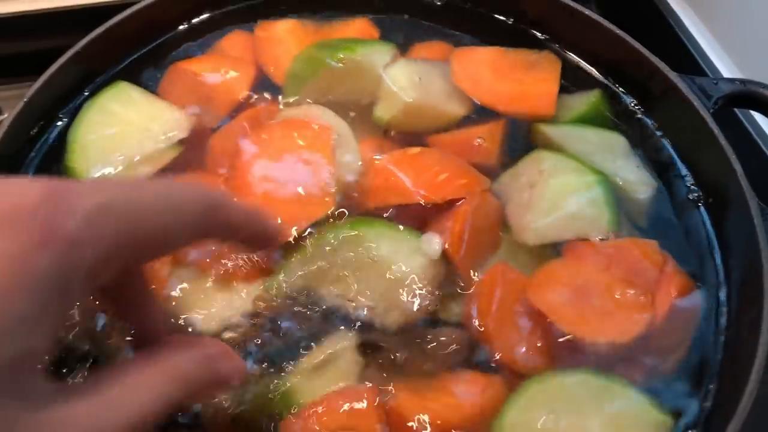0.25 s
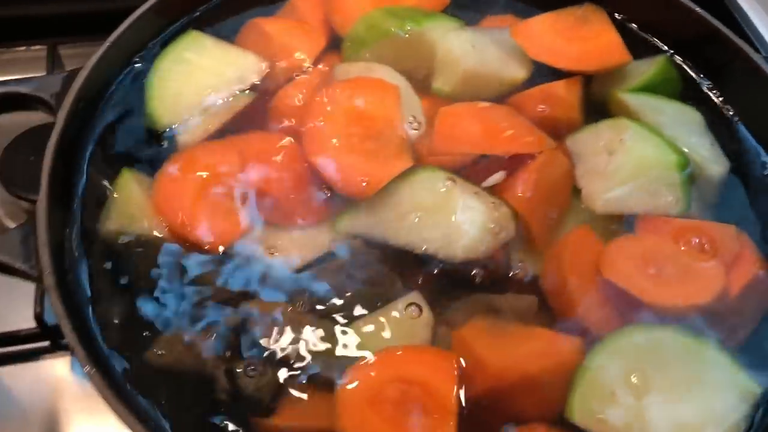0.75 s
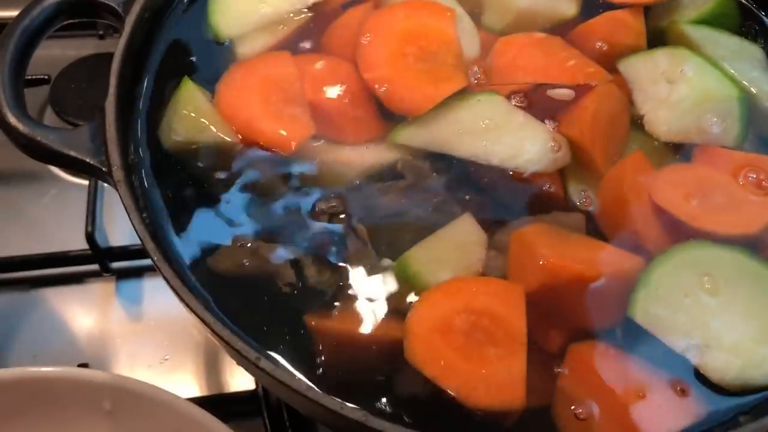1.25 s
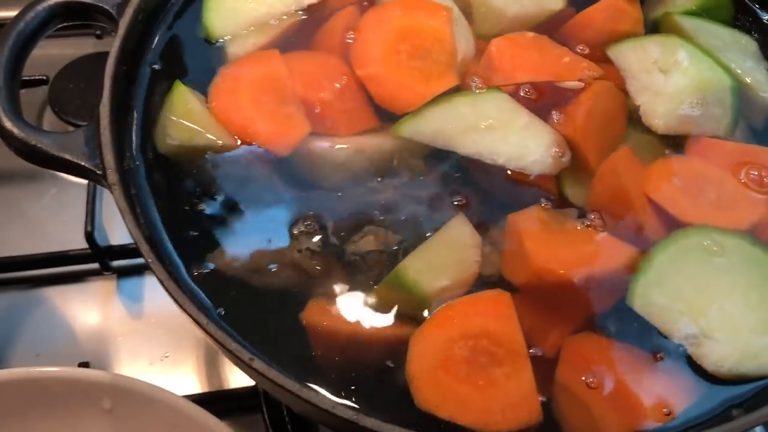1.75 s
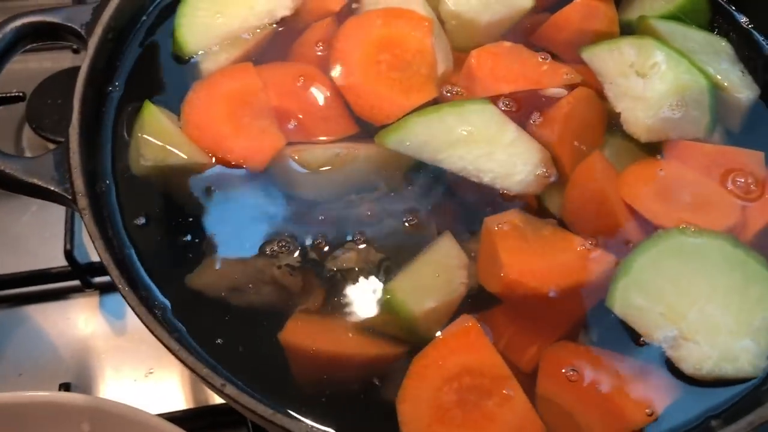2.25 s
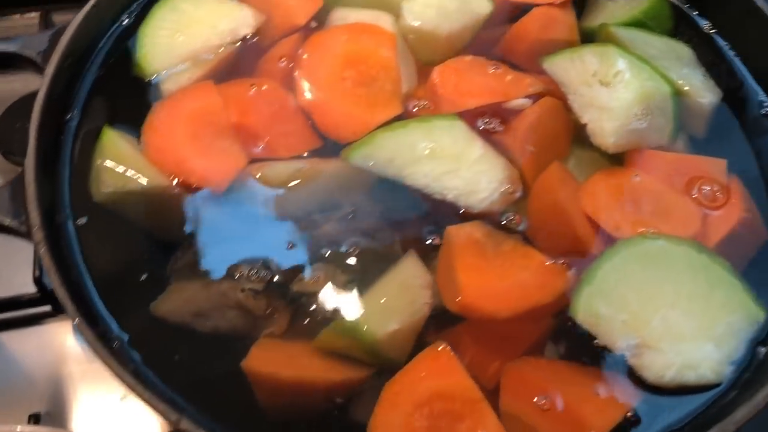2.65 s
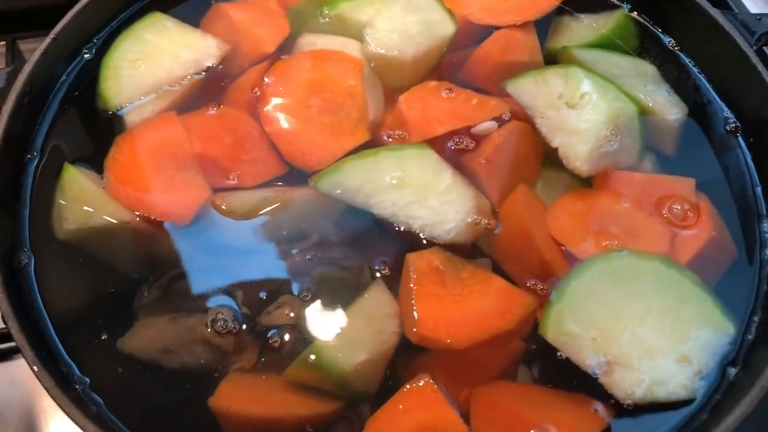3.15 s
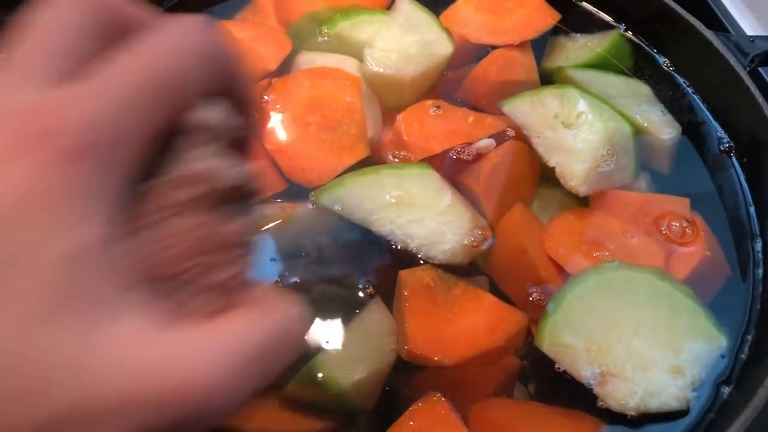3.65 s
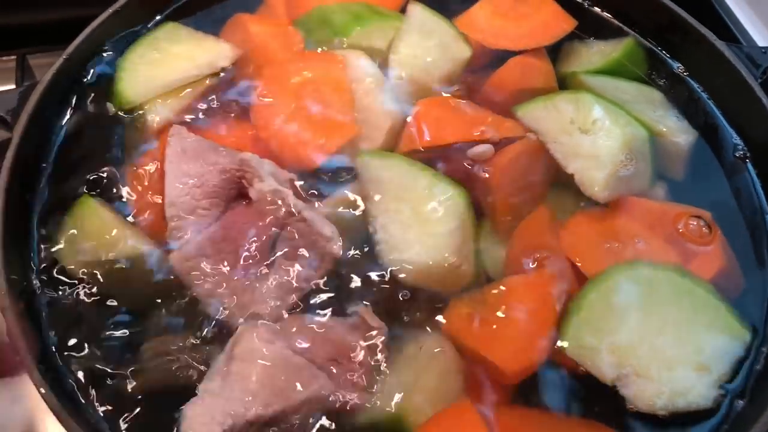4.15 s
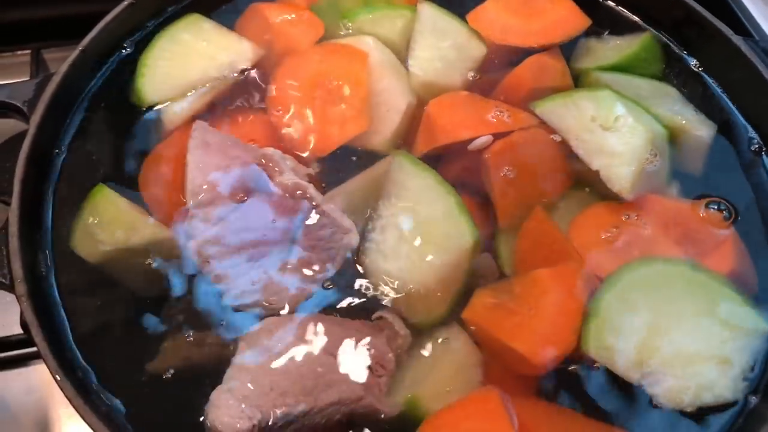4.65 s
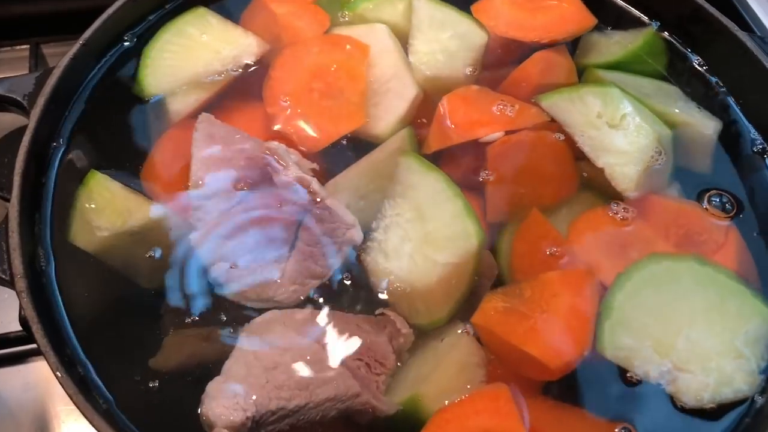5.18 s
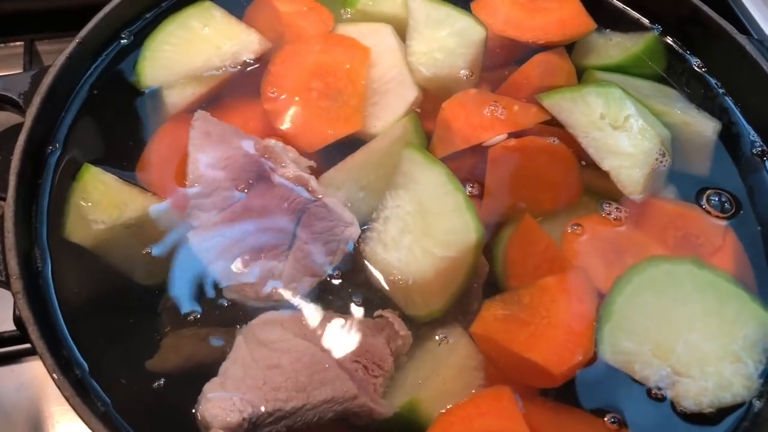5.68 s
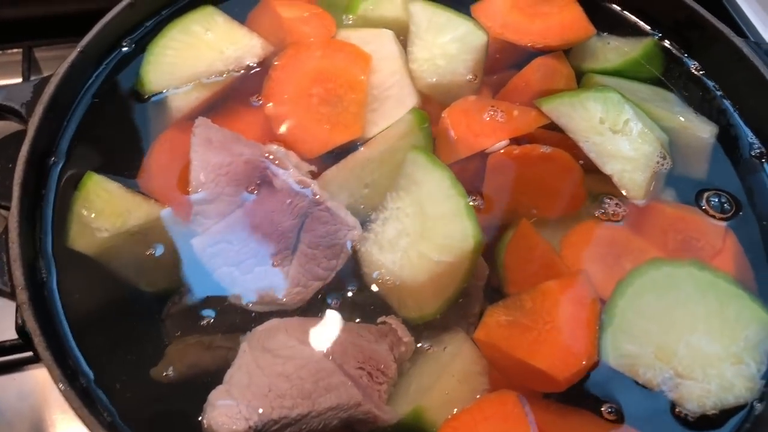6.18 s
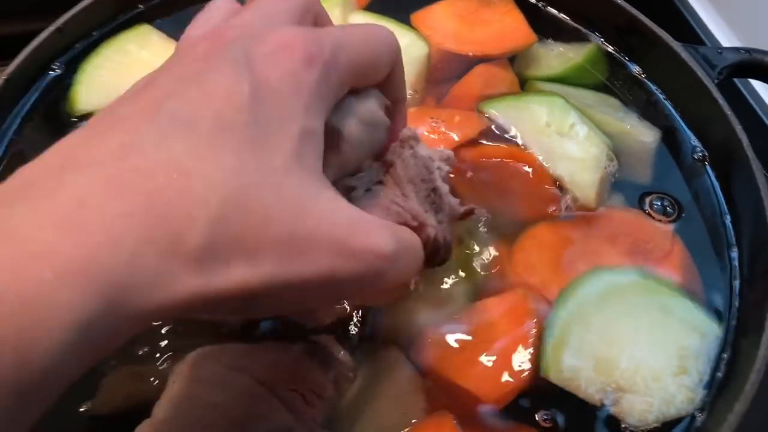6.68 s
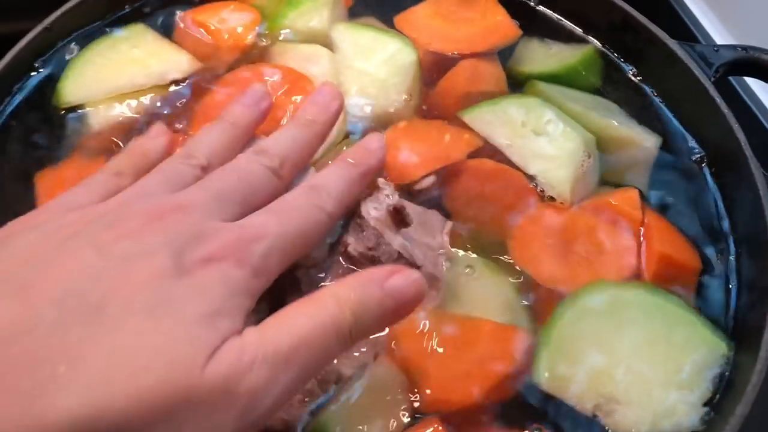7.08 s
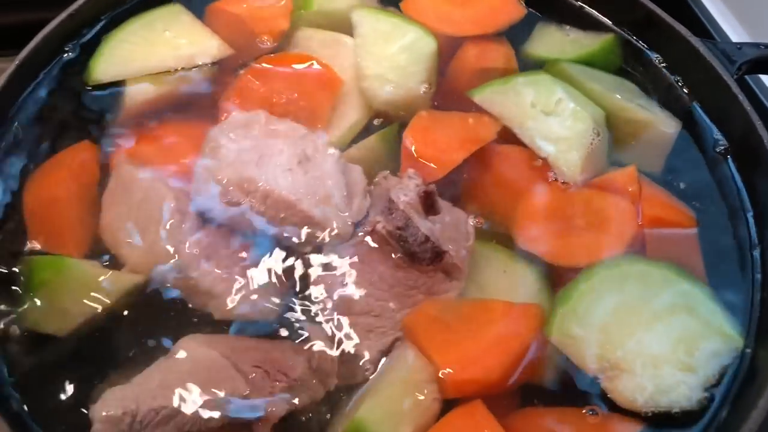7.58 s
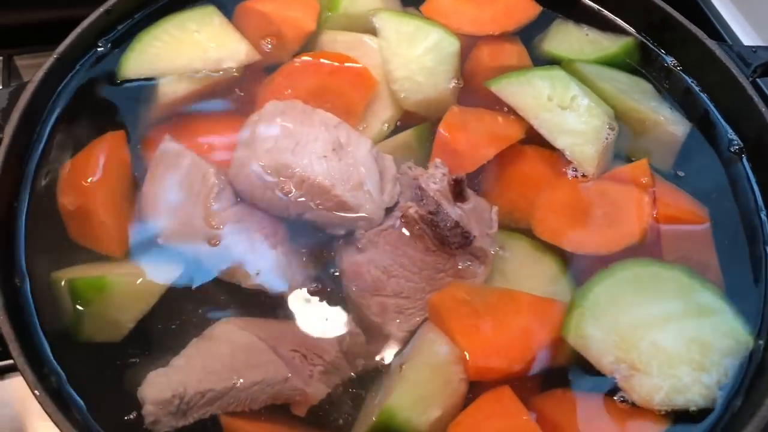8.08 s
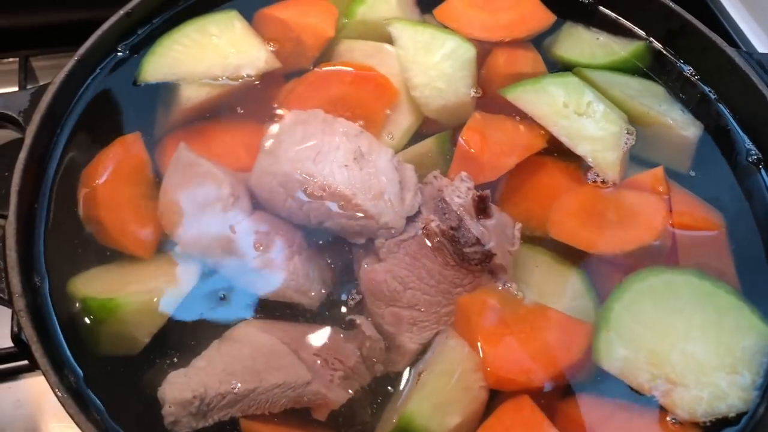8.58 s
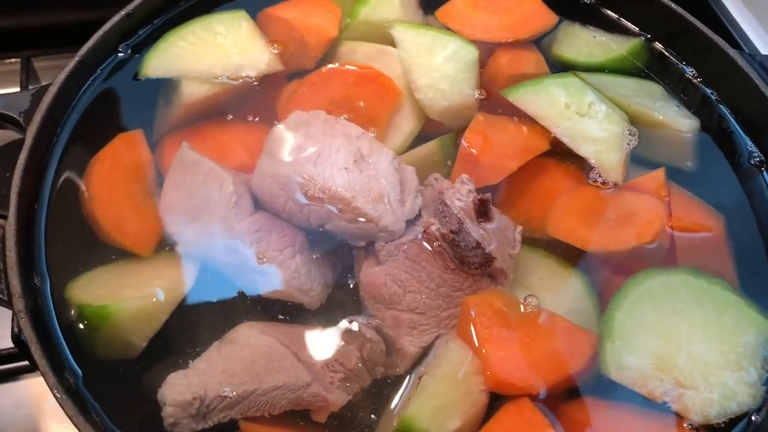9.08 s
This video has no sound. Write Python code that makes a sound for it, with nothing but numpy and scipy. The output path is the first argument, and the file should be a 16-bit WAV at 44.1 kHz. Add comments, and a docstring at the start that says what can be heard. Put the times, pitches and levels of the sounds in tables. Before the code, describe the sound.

A gas flame rumbles quietly and a fridge hums in a small, hard-walled kitchen, while soup heating close to the microphone gives off crisp little bubble snaps. Meat goes into the water twice, first with a slight splash, later with a fuller, plopping one. Around these, the iron pot ticks, clinks on its grate, and the sheet-metal hob knocks with a dull thud. Light ticking and fizzing carry on afterwards.

```python
"""A small kitchen, just above a cast-iron pot of soup heating on a gas hob.
A fridge hums and the burner rumbles; tiny bubbles fizz and snap as they burst. Twice a piece
of meat splashes in, and trapped air rings in the water. Thermal expansion makes the pot wall
tick, the pot slip on its iron grate and the sheet-metal hob buckle with a knock. Each metal
part rings in its own modes over a thud of the hollow stove, and hard walls add a short echo."""
import sys
import numpy as np
from scipy import signal
from scipy.fft import rfft, irfft
from scipy.io import wavfile

SR = 44100
rng = np.random.default_rng(int(sys.argv[2]) if len(sys.argv) > 2 else 0)


def digitize_waveform(pressure):
    """Quantize a signal to 16-bit integers and store it at the path in sys.argv[1].

    Rows of a 2-D input are taken as channels; values are limited to [-1, 1].
    """
    field = np.atleast_2d(pressure).T
    bounded = np.clip(field, -1, 1)
    quanta = np.round(bounded * 32767).astype(np.int16)
    wavfile.write(sys.argv[1], SR, quanta)


N = 411453
T = np.arange(SR // 2) / SR  # time axis of one event
EDGE_HZ = 16050  # upper band limit


def amp(db):
    """Amplitude ratio of a level: a factor of ten per 20 dB."""
    return 10 ** (np.asarray(db) / 20)


def evened(x):
    """Normalisation to an rms of 1."""
    return x / np.sqrt(np.mean(x ** 2) + 1e-20)


def read(points, hz):
    """Interpolation of (f/Hz, value) points on a logarithmic frequency axis."""
    f, value = np.transpose(points)
    return np.interp(np.log(hz + 1), np.log(f), value)


def add(mix, s, sound):
    """Superposition: a sound joins the mix at s seconds."""
    part = mix[max(round(s * SR), 0):][:len(sound)]
    part += sound[:len(part)]


def noise(spectrum, size):
    """Spectral shaping: noise of rms 1 whose spectrum follows (f/Hz, level/dB) points."""
    hz = np.fft.rfftfreq(size, 1 / SR)
    white = rfft(rng.standard_normal(size))
    return evened(irfft(white * amp(read(spectrum, hz)), size))


def dying(t60):
    """Exponential damping by 60 dB in t60 seconds."""
    return np.exp(-np.log(1000) * T / max(t60, 1e-4))


def colour(x, gain_db):
    """Minimum-phase filtering by a gain in dB given as a function of frequency."""
    hz = abs(np.fft.fftfreq(len(x), 1 / SR)) + 1
    log_gain = np.log(amp(gain_db(hz)))
    response = np.exp(signal.hilbert(log_gain).conj())
    return np.fft.ifft(np.fft.fft(x) * response).real


def kitchen(x, onset_s=0.0044):
    """Reverberation: dense reflections from hard walls, each band absorbed at its own rate."""
    # reverberation time: f/Hz, t60/s
    decay_times = [(150, 0.49), (1000, 0.34), (2500, 0.4), (4500, 0.37), (8000, 0.21), (16000, 0.18)]
    hz, t, bands = signal.stft(rng.standard_normal(len(T)), SR, nperseg=256)
    decay = amp(-60 * t / read(decay_times, hz)[:, None])
    tail = signal.istft(bands * decay, SR, nperseg=256)[1][:len(T)]
    tail *= np.minimum(T / onset_s, 1) ** 2
    return signal.oaconvolve(x, tail / np.linalg.norm(tail))[:N]


def fridge(hum_db=-62.0, whine_db=-77.0, mains_hz=50, shaft_hz=49.275, first_stroke_s=0.0125):
    """Forced vibration: a compressor hums at mains frequency and its piston drives a thin high ring."""
    # spectral envelope of the ring: f/Hz, level/dB
    spectrum = [(2800, -39), (2955, -5), (3005, 0.5), (3054, 7), (3103, 0), (3152, 4.5), (3201, -15),
                (3300, -6), (3349, -2), (3450, -28), (3600, -15)]
    # its slow wavering about whine_db: t/s, level/dB
    wavering = [(0, 1.5), (0.9, 1), (1.7, 2), (2.85, -3.5), (3.5, 0.5), (4.6, 0.5), (5.4, -3.5), (6.3, 1),
                (7.1, -1), (7.8, -0.5), (9.33, 0.5)]
    t = np.arange(N) / SR
    hum = np.sin(2 * np.pi * mains_hz * t)
    # the shaft's harmonics are partly in phase, so the whine trills once a turn
    harmonics_hz = shaft_hz * np.arange(57, 74)
    phases = 0.7 * rng.standard_normal(len(harmonics_hz))
    whine = sum(amp(read(spectrum, hz)) * np.cos(2 * np.pi * hz * (t - first_stroke_s) + phase)
                for hz, phase in zip(harmonics_hz, phases))
    waver_db = np.interp(t, *np.transpose(wavering))
    return amp(hum_db) * evened(hum) + amp(whine_db + waver_db) * evened(whine)


def burner(rumble_db=-57.0, rush_db=-71.5, flutter_db=0.5):
    """Combustion and flow noise: the flame rumbles and flutters under the soft rush of gas."""
    # spectrum of the flame: f/Hz, level/dB
    rumble = [(20, -43), (34, -11), (42, -21.5), (58, -2.5), (75, -9.5), (90, 3.5), (105, -8.5),
              (122, -0.5), (160, -8.5), (190, -3.5), (230, -12), (300, -12), (400, -20.5), (520, -19),
              (700, -28), (1500, -45), (16000, -88)]
    # spectrum of the gas flow: f/Hz, level/dB
    rush = [(20, -42), (500, -23), (700, -1), (790, 5.5), (1000, -1.5), (1500, -4), (2500, -6), (4000, -10),
            (8000, -15.5), (16000, -20.5)]
    flutter = noise([(1, 0), (8, 0), (30, -40), (100, -100)], N)
    return amp(rumble_db + flutter_db * flutter) * noise(rumble, N) + amp(rush_db) * noise(rush, N)


def snap(hz, t60=0.0046, scatter_db=-23, scatter_t60=0.14, samples=3600):
    """Film rupture: a sharp tick of unit energy around hz, trailed by its scatter inside the pot."""
    band = [(hz / 20, -60), (hz / 4, -36), (hz / 2, -15), (hz, 0), (hz * 2, -14)]
    envelope = dying(t60) + amp(scatter_db) * dying(scatter_t60)
    burst = colour(rng.standard_normal(samples) * envelope[:samples], lambda f: read(band, f))
    return burst / np.linalg.norm(burst)


def simmer(snap_db=8.5, calm_db=-86.5, clump_db=4, faint_db=-57, faint_range_db=11, surfacing_s=2.7):
    """Buoyancy brings bubbles up to burst: the loudest snap singly, the smallest merge into a fizz."""
    # the loudest bubbles and spits, plus the sharp crack that opens the slow slip of the pot at 7.64 s: t/s,
    # level/dB (raised by snap_db), f/Hz
    snaps = [(0.1163, -44, 15300), (0.435, -39, 13100), (0.6523, -47, 11100), (0.9163, -46.5, 11100),
             (0.9982, -36, 9300), (1.5253, -42, 9900), (1.802, -43, 6000), (1.8841, -49, 14100),
             (2.7307, -48, 12000), (2.8614, -47.5, 12600), (3.2146, -43, 6400), (3.6132, -42.5, 12000),
             (3.6306, -44, 11500), (3.7347, -33, 12000), (4.3226, -34.5, 12400), (4.7404, -41.5, 12100),
             (5.1991, -52, 14400), (5.3797, -50, 15700), (5.6325, -44, 7580), (5.679, -42, 9700),
             (5.7544, -43.5, 11200), (5.8417, -41.5, 11100), (6.2966, -49, 6600), (6.3323, -40.5, 14100),
             (6.876, -35, 8830), (7.1617, -31, 12500), (7.429, -36.5, 15400), (7.6358, -36, 7960),
             (8.6431, -34, 13700), (9.177, -42.5, 6200)]
    # a hand or rising bubbles stir the water: t/s, level/dB, half width/s
    stirs = [(0.15, -80, 0.37), (0.658, -73, 0.049), (2.0, -79, 0.17), (2.8, -75, 0.085),
             (3.802, -69, 0.06), (5.702, -88, 0.12), (6.52, -79, .06), (6.69, -59, 0.041)]
    # spectrum of the fizz: f/Hz, level/dB
    fizz_spectrum = [(500, -45), (1500, -18), (4000, -2), (7000, 0), (10000, -1), (13000, 0), (15000, -2),
                     (16000, -6)]
    out, t = np.zeros(N), np.arange(N) / SR
    for s, db, hz in snaps:
        add(out, s, amp(db + snap_db) * snap(hz))
    fizz_power = amp(calm_db) ** 2
    for s, db, width in stirs:
        fizz_power = fizz_power + (amp(db) / (1 + abs(t - s) / width)) ** 2
        for wait, size, pitch in rng.random((14, 3)):  # each stir leaves faint bubbles to surface
            burst_s = s - width + wait * (surfacing_s + 4 * width)
            add(out, burst_s, amp(faint_db + faint_range_db * size ** 2) * snap(8000 + 7000 * pitch))
    # the smallest bubbles burst in clumps a few milliseconds long
    flicker = noise([(20, 0), (200, -3), (600, -40), (2000, -100)], N)
    clumps = evened(amp(clump_db * flicker))
    return out + np.sqrt(fizz_power) * clumps * noise(fizz_spectrum, N)


def bubble(hz, t60, glide, samples=3000):
    """Bubble resonance: an air pocket rings, its pitch climbing as it nears the surface."""
    t = T[:samples]
    pitch = np.minimum(hz * (1 + glide * np.minimum(t / t60, 1)), SR / 2)
    envelope = dying(t60)[:samples] * (1 - np.exp(-t * hz))
    return envelope * np.sin(2 * np.pi * np.cumsum(pitch) / SR)


def cloud(hz, scale_s, spread=0.26, cycles=18, count=120):
    """Air entrainment: a quick cloud of small bubbles rings around one pitch, thickest at its start."""
    out = np.zeros(SR // 4)
    for order, (detune, strength) in enumerate(rng.standard_normal((count, 2))):
        age = 3 * (order / count) ** 1.2  # in units of scale_s
        pitch = hz * np.exp(spread * detune)
        if pitch < EDGE_HZ:
            ring = bubble(pitch, cycles / pitch, glide=0.37, samples=600)
            add(out, age * scale_s, strength * np.exp(-age * 0.83) * ring)
    return out * np.sqrt(scale_s * SR / (np.sum(out ** 2) + 1e-12))


def splashes(spray_db=-9.5, spray_pitch_ratio=2.47, spray_time_ratio=3.2):
    """Impact on water: each slap throws a finer, longer spray, and trapped air pockets plop."""
    # meat and fingers meet the water: t/s, level/dB, centre f/Hz, time scale/s
    slaps = [(3.826, -46, 6700, 0.0046), (3.8736, -40, 3060, 0.0049), (6.63, -47.5, 11300, 0.0024),
             (6.6767, -28.5, 2700, .003), (6.6845, -31.5, 3990, .0055), (6.8073, -38, 4770, 0.0025),
             (6.823, -41.5, 8700, .004)]
    # ringing air pockets: t/s, level/dB, starting f/Hz, t60/s
    plops = [(0.721, -60, 6200, .015), (6.645, -35.5, 1275, 0.015), (6.647, -26, 2010, 0.0044),
             (6.702, -24, 1020, 0.0073), (6.789, -32.5, 5900, 0.0079), (6.8874, -45.5, 2314, 0.038),
             (6.889, -49, 4050, 0.033), (6.9316, -36.5, 6040, 0.0042)]
    out = np.zeros(N)
    for s, db, hz, scale_s in slaps:
        add(out, s, amp(db) * cloud(hz, scale_s))
        spray = cloud(min(hz * spray_pitch_ratio, 12500), scale_s * spray_time_ratio, spread=0.537)
        add(out, s, amp(db + spray_db) * spray)
    for s, db, hz, t60 in plops:
        add(out, s, amp(db) * bubble(hz, t60, glide=0.1))
    return out


def bumps(rise_s=0.0073, t60=0.35):
    """Damped oscillation: a soft push sways the stove with one low note."""
    # pushes against the stove: t/s, level/dB, f/Hz
    pushes = [(3.489, -47.5, 83.5), (3.515, -50, 115)]
    out = np.zeros(N)
    envelope = (1 - np.exp(-T / rise_s)) * dying(t60)
    for s, db, hz in pushes:
        add(out, s, amp(db) * envelope * np.sin(2 * np.pi * hz * T))
    return out


def thud(db, rise_s=0.0064, t60=0.28):
    """Body resonance: the hollow stove swells up under a knock and booms briefly."""
    # spectrum of the stove body: f/Hz, level/dB
    body = [(15, -65), (40, -11), (75, -1), (130, 0.5), (200, -2.5), (320, -1.5), (420, -4), (540, -7),
            (720, -19), (1000, -17.5), (1500, -38.5), (3000, -21.5), (16000, -97)]
    return amp(db) * (1 - np.exp(-T / rise_s)) * dying(t60) * noise(body, len(T))


def struck(modes, crack, crack_db, crack_t60, slip_s=0, twin=0.15, split_hz=22, swell_hz=2780):
    """Modal vibration: struck metal cracks; its modes swell during a slip, then decay in beating pairs."""
    ring = np.zeros(len(T))
    for hz, db, t60 in modes:
        twin_hz = hz + split_hz * rng.uniform(-0.97, 1)
        pair = (np.sin(2 * np.pi * hz * T) + twin * np.sin(2 * np.pi * twin_hz * T)) / (1 + twin)
        rise_s = max(slip_s * swell_hz / hz, 1 / SR)  # lower modes swell for longer
        swell = np.sqrt(np.minimum(T / rise_s, 1))
        decay = np.exp(-np.log(1000) * np.maximum(T - rise_s, 0) / t60)
        ring += amp(db) * swell * decay * pair * rng.choice([-1, 1])
    return ring + amp(crack_db) * dying(crack_t60) * noise(crack, len(T))


def tick(ring, db, tilt, thud_db):
    """Impulse excitation: iron jerks and the stove thuds; a higher tilt stands for a shorter jerk."""
    tilted = colour(ring, lambda hz: tilt * np.log2(np.clip(hz, 2500, 14000) / 3500))
    return amp(db) * tilted + thud(thud_db)


def creep(ring_hz=4330, scatter_hz=120, t60=0.065, range_db=5, count=14):
    """Frictional creep: a run of tiny slips excites only the strongest mode of the iron."""
    # the pot creeps on the grate: start t/s, end t/s, highest level/dB
    runs = [(1.523, 1.79, -73), (8.18, 8.66, -68.5), (9.267, 9.326, -66.5)]
    out = np.zeros(N)
    for start, end, db in runs:
        for when, softness, detune in rng.random((count, 3)):
            hz = ring_hz + scatter_hz * (detune - 0.5)
            ping = dying(t60) * np.sin(2 * np.pi * hz * T)
            add(out, start + when * (end - start), amp(db - range_db * softness) * ping)
    return out


def grate_bars(thud_db=-22.5, thud_db_per_db=0.62):
    """Stick-slip friction of pot on grate: a quick slip clinks, a slow one makes the bar sing."""
    # modes of a grate bar: f/Hz, level/dB, t60/s
    modes = [(829, -21, .24), (1050, -20, .13), (1803, -10, .24), (2972, -8, .19), (4371, -1, .075),
             (5975, -11.5, .1), (7773, -13, .07), (7946, -20, .09), (8985, -28, .1), (9722, -20, .1),
             (11890, -19, .07), (13150, -26, .07), (14220, -29, .11)]
    # spectrum of the contact's crack: f/Hz, level/dB
    crack = [(300, 28.5), (1000, 27), (2400, 13), (4300, 0), (5200, -46), (8000, 9), (11000, -43),
             (16000, -34)]
    # slips of the pot: t/s, level/dB, tilt/(dB per octave), duration/s
    slips = [(0.9924, -49.5, 0, 0.0074), (1.1485, -64, 0, .002), (1.4341, -60, -0.5, 0.0042),
             (1.763, -58, -2, 0.0032), (4.3636, -30.5, 3.5, 0.0008), (4.4623, -47.5, 2, 0.0012),
             (7.6367, -47.5, 0, 0.043), (7.71, -51.5, -3.5, 0.0027), (8.651, -54, -6, 0.041),
             (8.6949, -45, -7, .005)]
    out = np.zeros(N)
    for s, db, tilt, slip_s in slips:
        ring = struck(modes, crack, crack_db=-11, crack_t60=0.15, slip_s=slip_s)
        add(out, s, tick(ring, db, tilt, thud_db + thud_db_per_db * db))
    return out


def hob(pop_hz=1350, pop_db=11.0, pop_t60=0.0076):
    """Thermal buckling: the sheet snaps through with a hollow pop; a slow one spares the high modes."""
    # modes of the sheet metal: f/Hz, level/dB, t60/s
    modes = [(203.6, -10.5, 0.21), (269.7, -12.5, 0.28), (535, -14, 0.3), (652, -20.5, 0.4),
             (968, -12.5, 0.13), (1326, -12, .1), (1520, -6, 0.085), (1655, -6.5, 0.075), (1780, -11, 0.47),
             (2056, -9.5, 0.24), (2309, -30, 0.33), (2400, -10, 0.073), (3590, -21, 0.12),
             (4300, -5, 0.054), (4310, -25.5, 0.37), (5270, -28, 0.093), (5975, -32, 0.24),
             (6670, -8.5, 0.035), (7870, -21.5, 0.088)]
    # spectrum of its crack: f/Hz, level/dB
    crack = [(200, -24), (700, -8.5), (1300, -4.5), (2000, -2), (2800, -13.5), (4300, -11.5), (5500, -35),
             (7000, -31), (9000, -36), (10000, -29), (12000, -38), (16000, -38)]
    # knocks of the sheet: t/s, level/dB, cutoff f/Hz, thud level/dB
    knocks = [(1.7273, -42.5, 860, -54), (4.8607, -26.8, 14100, -34), (5.9981, -36.5, 1900, -42)]
    out = np.zeros(N)
    pop = amp(pop_db) * dying(pop_t60) * np.sin(2 * np.pi * pop_hz * T)
    for s, db, cutoff_hz, thud_db in knocks:
        ring = struck(modes, crack, crack_db=-2.5, crack_t60=0.11)
        knock = colour(ring + pop, lambda hz: -10 * np.log10(1 + (hz / cutoff_hz) ** 8))
        add(out, s, amp(db) * knock + thud(thud_db))
    return out


def pot_wall():
    """Thermal expansion: the warming iron moves in jerks, each of which rings the pot wall."""
    # modes of the pot wall: f/Hz, level/dB, t60/s
    modes = [(1083, -3, 0.017), (2260, -11, 0.04), (2442, 3, 0.058), (4286, -3.5, 0.059),
             (6590, -10, 0.031), (7140, -20, 0.0298), (7920, -13, 0.037), (8800, -29, .06),
             (9430, -27, 0.1), (9990, -13, 0.022), (12500, -31, 0.054), (14950, -27, .06),
             (15300, -33, 0.043)]
    # spectrum of its crack: f/Hz, level/dB
    crack = [(300, -29), (680, -16), (1000, 6), (1500, -71), (2400, 9.5), (3400, -6), (4300, 2),
             (5700, -10), (6800, -2), (8500, -19), (10000, -14), (11500, -15), (16000, -28)]
    # jerks of the wall: t/s, level/dB, tilt/(dB per octave), thud level/dB
    jerks = [(1.726, -56.5, -4.5, -53), (3.1396, -25, -0.5, -39.5), (4.6544, -58, -13, -50.5),
             (4.8013, -56.5, 6.5, -54), (5.6148, -56, -12, -56), (5.9863, -54, 11.5, -75),
             (6.018, -62.5, 19.5, -52), (7.908, -64, 6, -64), (7.9347, -60.5, 2, -64),
             (8.1336, -64, -1, -67), (8.295, -60.5, 1, -61), (8.6957, -50.5, 11, -47),
             (8.861, -63.5, 4, -70), (9.255, -62.5, -11, -75)]
    out = np.zeros(N)
    for s, db, tilt, thud_db in jerks:
        ring = struck(modes, crack, crack_db=-9, crack_t60=0.067)
        add(out, s, tick(ring, db, tilt, thud_db))
    return out


def scene():
    """Direct and reverberant sound: metal and water close by, the kitchen around them."""
    pot, grate, knocks = pot_wall(), grate_bars() + creep(), hob()
    water, fizz = splashes(), simmer()
    echo = kitchen(amp(-12) * (pot + water) + amp(-16) * grate + amp(-13) * knocks + amp(-24) * fizz)
    return (pot + grate + knocks + bumps() + water + fizz + echo + burner() + fridge())[None]


def record(dry):
    """Band limiting: a steep low-pass filter removes the treble above EDGE_HZ."""
    lowpass = signal.firwin(511, EDGE_HZ, window=("kaiser", 9), fs=SR)
    return signal.oaconvolve(dry, lowpass[None], "same")


dry = scene()
out = record(dry)
digitize_waveform(out)
```